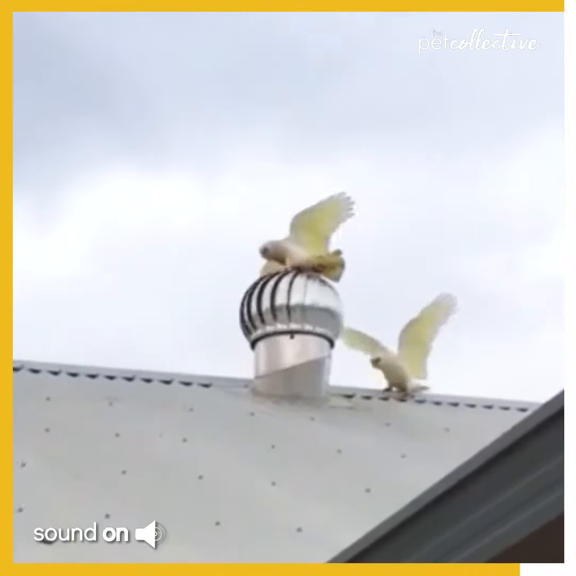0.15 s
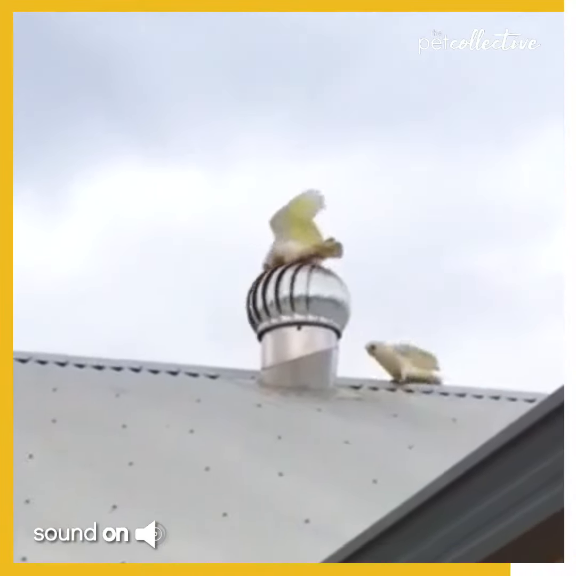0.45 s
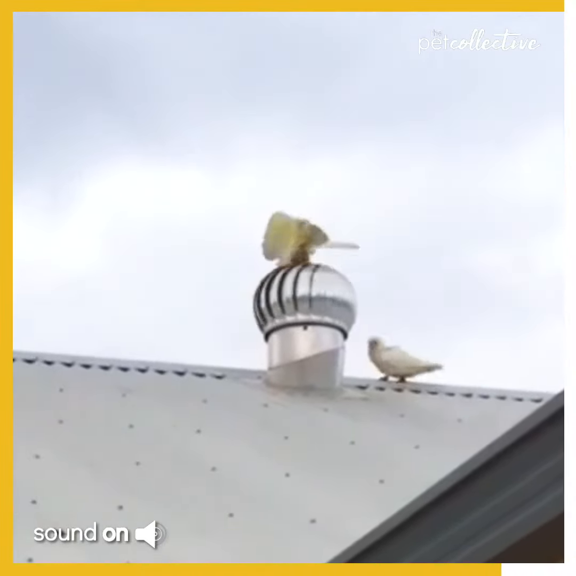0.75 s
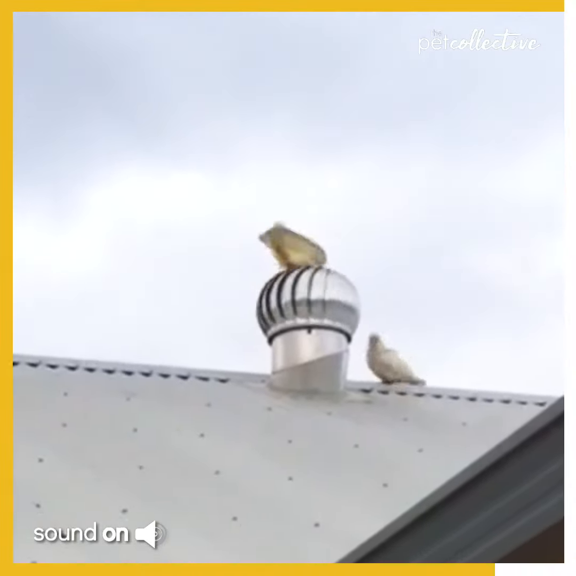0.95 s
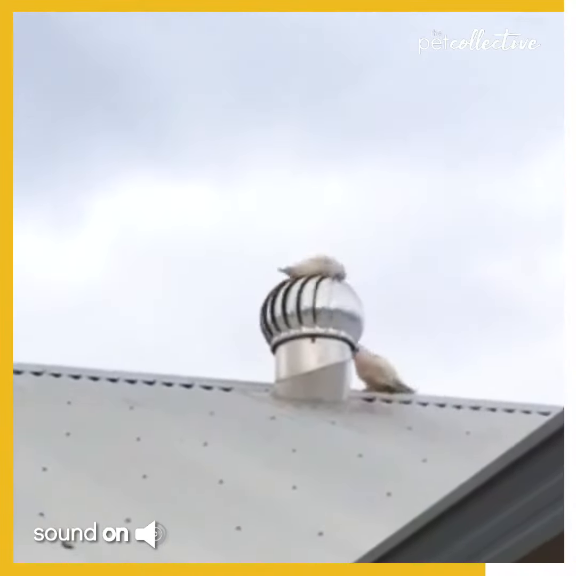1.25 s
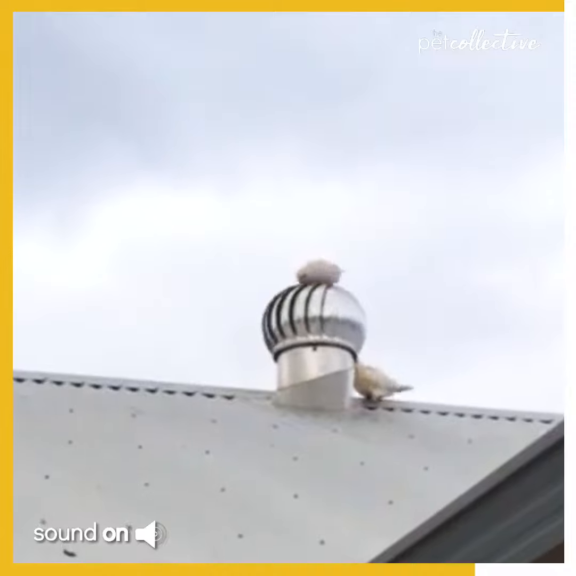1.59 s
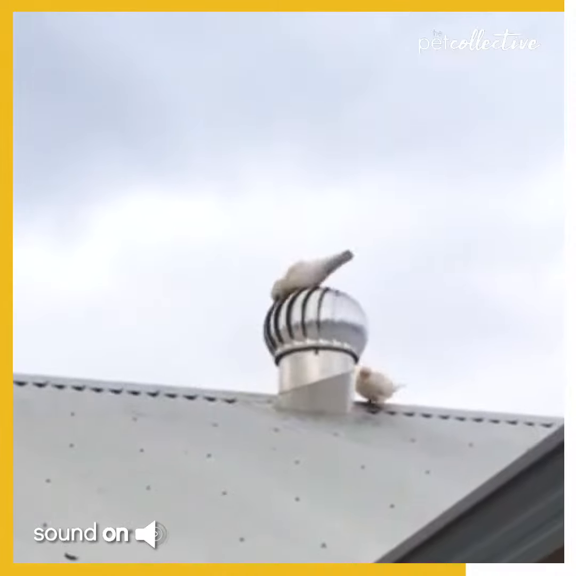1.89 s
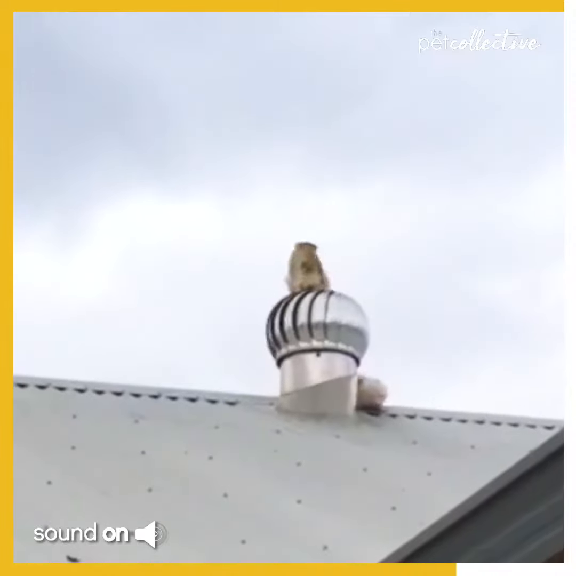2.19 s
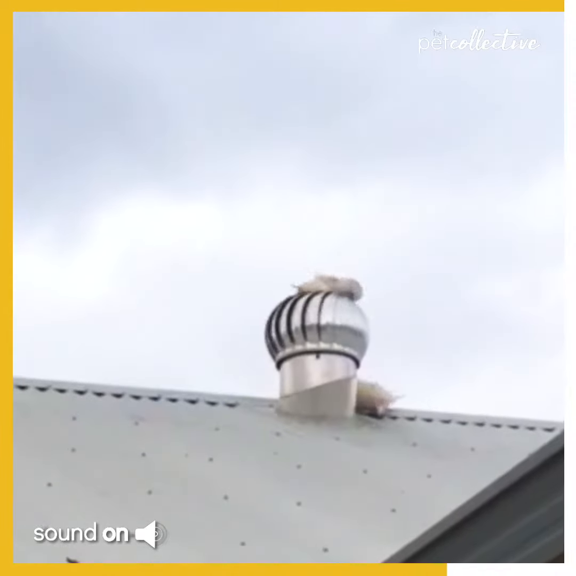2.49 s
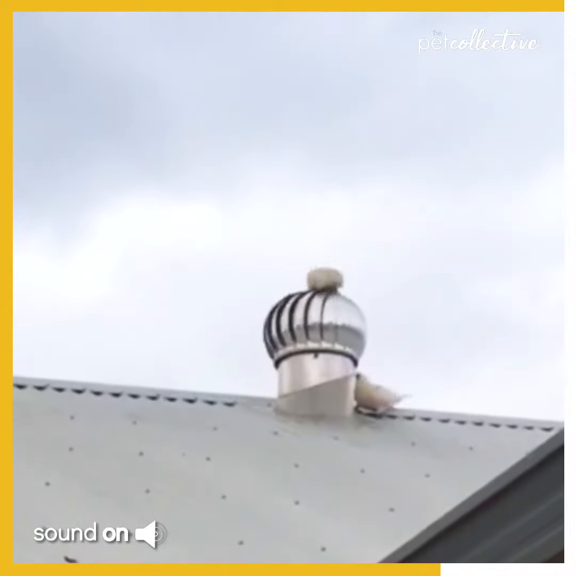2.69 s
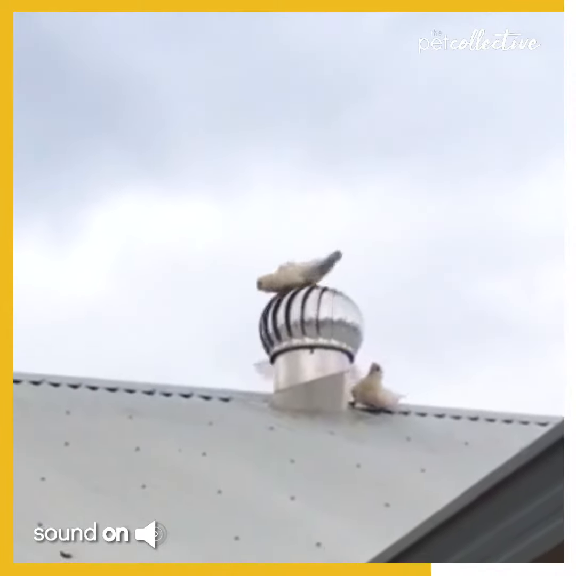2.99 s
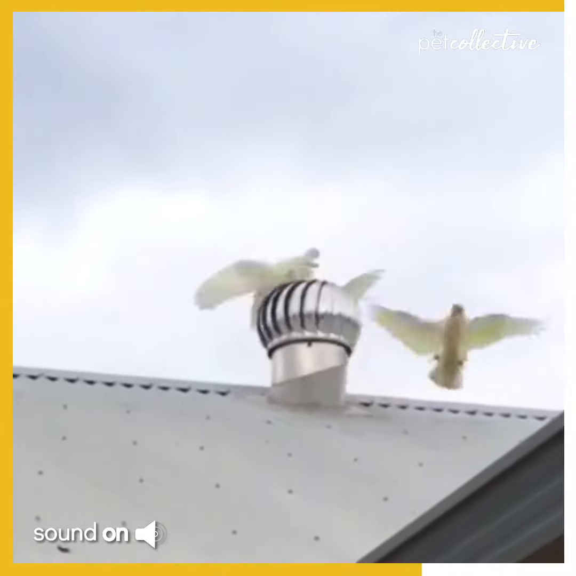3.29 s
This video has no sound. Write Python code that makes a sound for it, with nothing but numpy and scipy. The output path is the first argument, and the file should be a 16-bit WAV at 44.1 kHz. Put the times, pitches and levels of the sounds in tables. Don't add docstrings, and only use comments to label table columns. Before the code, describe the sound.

Outdoors near a busy road, a close cockatoo screeches three times while others squawk behind; engines drone low, and the background dips under loud calls. Later come small peeps, a whistling call and brief feather swishes.

```python
import sys
import numpy as np
from scipy import signal
from scipy.fft import rfft, irfft, next_fast_len
from scipy.io import wavfile
from scipy.ndimage import map_coordinates

SR = 44100
rng = np.random.default_rng(int(sys.argv[2]) if len(sys.argv) > 2 else 0)


def store_wav(level_fs):
    pcm = np.round(np.clip(np.atleast_2d(level_fs), -1, 1) * 32767)
    wavfile.write(sys.argv[1], SR, pcm.T.astype(np.int16))


def convert_level_to_amplitude(level_db):
    exponent = np.asarray(level_db, float) / 20
    return 10 ** exponent


N = 152145
T = np.arange(N) / SR

# time_s, level_db
ROAR_LEVEL = [(0.0, -38.5), (0.22, -38.5), (0.37, -37.5), (0.51, -40.5), (0.64, -48.5), (0.93, -44),
              (1.13, -41.5), (1.74, -41.5), (2.12, -37), (2.87, -39.5), (3.08, -39.5), (3.45, -36.5)]
# frequency_hz, density_db
ROAR_SPECTRUM = [(25, -17.5), (60, 0), (110, -8.5), (200, -9), (450, -22), (750, -15), (1800, -25.5),
                 (10500, -52)]
# time_s, firing_hz, level_db
CAR = [(0, 97, -34), (.06, 101, -32), (.35, 101, -29), (.42, 90, -34), (.5, 86, -50)]
# time_s, firing_hz, level_db
TRUCK = [(1.45, 56, -46), (1.75, 59, -33), (1.97, 60, -34), (2.08, 72, -34), (2.6, 72, -30), (3.1, 73, -35),
         (3.2, 73, -42), (3.45, 60, -36)]
FIRING_ORDERS = [0, -14, -14, -26]
# centre_s, frequency_hz, peak_db, half_width_s
GUSTS = [
    (1.063, 78.5, -17.5, 0.016),
    (3.263, 51.74, -18.5, 0.03),
    (3.455, 51, -24, 0.036),
]
# centre_s, level_db, half_width_s
WINGS = [(2.69, -51, .011), (3.218, -42, .011), (3.15, -52, .1), (2.45, -55, .015), (3.27, -53, .02)]
# frequency_hz, level_db
FEATHER_SPECTRUM = [(1500, -30), (4000, -6), (9000, 0), (11000, -1), (11500, -80)]
# start_s, length_s, low_hz, high_hz, level_db
SIDE_NOISES = [(0.115, 0.031, 5300, 6300, -59), (1.185, 0.032, 10300, 11000, -65),
               (1.348, 0.029, 4180, 5650, -34), (2.022, 0.032, 10300, 11100, -75),
               (3.388, .04, 5600, 7000, -53)]
# time_s, level_db
CHORUS_LEVEL = [(0, -41), (.2, -41), (.5, -28.5), (.8, -49), (1, -32), (1.1, -29.5), (1.4, -30.5),
                (1.8, -33), (2.3, -42), (2.55, -37), (2.75, -37.5), (3, -34), (3.18, -30), (3.3, -34.5),
                (3.45, -35)]
# start_s, length_s, start_pitch_hz, end_pitch_hz, level_db
FAR_CALLS = [(-.05, 0.094, 891, 930, -33), (.26, 0.23, 732, 630, -37.5), (1.14, 0.043, 819, 900, -24.5),
             (1.75, 0.12, 732, 775, -38), (1.87, 0.13, 815, 905, -31.5), (2.4, 0.13, 743, 745, -45.5),
             (2.665, 0.056, 771.3, 670, -36.5), (2.75, .07, 777, 875, -37), (2.87, 0.0398, 820, 810, -40),
             (3.12, 0.05, 856, 970, -38), (3.18, .06, 776, 905, -36.5), (3.28, 0.062, 860, 900, -37.5)]
# start_s, length_s, start_pitch_hz, end_pitch_hz, level_db
PEEPS = [(2.47, .03, 755, 725, -33), (2.52, .02, 710, 730, -38), (2.56, .04, 775, 815, -35),
         (2.65, .03, 825, 810, -31), (3.3, .03, 870, 860, -37)]
# time_s, pitch_hz, level_db
CHIRP = [(2.485, 3650, -52), (2.497, 3400, -41), (2.515, 3050, -37), (2.54, 3250, -37), (2.562, 3700, -41),
         (2.578, 3900, -54)]
# time_s, pitch_hz, level_db, second_over_first_db
COO = [(1.01, 675, -44, -6), (1.035, 690, -38, -6), (1.075, 795, -37, -1), (1.105, 680, -41, -8),
       (1.14, 673, -35, -6), (1.185, 690, -40, -4), (1.22, 740, -50, 0), (1.31, 740, -48, 0),
       (1.325, 740, -36, -5), (1.44, 705, -36, -5), (1.46, 670, -43, 3), (1.51, 655, -43, 11),
       (1.555, 655, -39, 8), (1.575, 720, -42, 4), (1.6, 750, -42, 2), (1.64, 680, -43, 0),
       (1.69, 670, -40, -6), (1.72, 675, -50, -6)]
# time_s, pitch_hz, level_db
WHISTLE = [(2.6, 700, -52), (2.64, 700, -40), (2.74, 722, -40), (2.86, 718, -38), (2.96, 730, -39),
           (3.03, 732, -36), (3.1, 715, -38), (3.2, 735, -39), (3.28, 712, -41), (3.36, 735, -39),
           (3.41, 700, -40), (3.46, 640, -42)]
WHISTLE_OVERTONES = [-14, -14, 0, -16, -14, -7]
# time_s, pitch_hz, level_db, roughness (0 clear, 1 harsh)
FIRST_SCREECH = [(.2, 737.7, -46, 1.2), (.41, 754, -30.5, 1.16), (.435, 790, -24, 0.98),
                 (.505, 801, -24, 0.95), (.53, 790, -21, 0.48), (.575, 780, -20.5, 0.31),
                 (.79, 752, -21.5, 0.09), (.83, 742.7, -21, 0.84), (.9, 748, -25, 0.9),
                 (.95, 738, -34.5, 0.97)]
SECOND_SCREECH = [(1.115, 700, -45, .8), (1.155, 720, -25.5, 0.8), (1.27, 745.6, -24, 0.607),
                  (1.34, 748.4, -22.5, 0.47), (1.42, 725, -26.5, 0.72), (1.5, 733, -23, 0.74),
                  (1.58, 739, -23.5, 0.65), (1.65, 766.6, -26.5, 0.7), (1.7, 740, -39, 0.9)]
THIRD_SCREECH = [(1.93, 897, -31, 0.8546), (1.97, 925, -26, 0.81), (2.07, 965, -23, 0.9),
                 (2.12, 933.4, -26, 0.98), (2.18, 1050, -27, 0.89), (2.26, 1010, -27, 0.83),
                 (2.33, 985, -31, 0.91), (2.43, 995, -28, 0.8), (2.47, 940, -57, 0.65)]
# time_s, pitch_hz
CLEAR_PITCH = [(.52, 785), (.54, 803), (.575, 782), (.625, 760), (.655, 756), (.68, 783), (.715, 778),
               (.75, 752), (.84, 756)]
CLEAR_OVERTONES = [-20, -16, 0, -14, -12, -10, -15, -16, -21, -28, -31, -32, -34]
# centre_hz, width_hz, level_db
THROAT_FAR = [(790, 520, -6.5), (1670, 1130, -6.5), (2224, 350, 3), (2636, 240, 1), (3256, 270, -1.5),
              (4390, 950, -8.5), (6080, 1130, -12.5)]
THROAT_PEEP = [(800, 400, -4), (1600, 500, 0), (2400, 500, -10), (3300, 500, -9), (5000, 1500, -26)]
THROAT_FIRST = [(1130, 150, -7), (2360, 400, -1), (3490, 530, 0), (5040, 700, -6), (6190, 1530, -10.5),
                (8900, 5400, -50)]
THROAT_SECOND = [(700, 460, -11), (1225, 220, -1), (2343, 400, 2), (3610, 370, 3.5), (5012, 620, -5),
                 (6535, 990, -8.5), (9300, 7500, -23)]
THROAT_THIRD = [(1005, 390, 2.5), (2090, 450, 1.5), (2600, 230, 1.5), (3200, 384, -1.5), (4480, 490, -4.5),
                (6093, 1000, -13.5), (9000, 2200, -29.5)]


def unit(x):
    return x / np.sqrt(np.mean(x ** 2) + 1e-20)


def curves(rows):
    time_s, *columns = np.transpose(rows)
    return [np.interp(T, time_s, column) for column in columns]


def inside(rows):
    edge_s = .005
    after_start = T - rows[0][0] + edge_s
    before_end = rows[-1][0] + edge_s - T
    return np.clip(np.minimum(after_start, before_end) / edge_s, 0, 1)


def wobble(rate_hz):
    knots = rng.standard_normal(int(N * rate_hz / SR) + 4)
    return map_coordinates(knots, [T * rate_hz])


def phase(pitch_hz):
    return 2 * np.pi * np.cumsum(pitch_hz) / SR


def filtered(x, response):
    size = next_fast_len(N + SR // 2)
    hz = np.fft.rfftfreq(size, 1 / SR)
    return irfft(rfft(x, size) * response(hz), size)[:N]


def noise(spectrum):
    points_hz, points_db = np.transpose(spectrum)

    def colour(hz):
        return convert_level_to_amplitude(np.interp(np.log(hz + 1), np.log(points_hz), points_db, -120))
    return unit(filtered(rng.standard_normal(N), colour))


def yard(x, wet_db):
    t60_s, first_echo_s = .4, .004
    t = T[:SR // 2]
    tail = rng.standard_normal(len(t)) * convert_level_to_amplitude(-60 * t / t60_s) * (t > first_echo_s)
    wet = signal.fftconvolve(x, tail / np.linalg.norm(tail))[:N]
    return (x + convert_level_to_amplitude(wet_db) * wet) / np.sqrt(1 + convert_level_to_amplitude(2 * wet_db))


def fades(count):
    depth_db, rate_hz = 2.4, 55
    knots = convert_level_to_amplitude(depth_db * rng.standard_normal((count, 4 * rate_hz)))
    return [np.interp(T * rate_hz, np.arange(len(gains)), gains) for gains in knots]


def overtones(pitch_hz, levels):
    cycle = np.exp(1j * phase(pitch_hz))
    partial, stack = cycle, 0
    for level, fade in zip(levels, fades(len(levels))):
        stack = stack + level * fade * partial.real
        partial = partial * cycle
    return stack, cycle.real


def syrinx(pitch_hz, rough):
    jitter, breath, scatter_db = .08, .9, 2.5
    shaken_hz = pitch_hz * (1 + .003 * wobble(40) + jitter * rough * wobble(350))
    pulses, cycle = overtones(shaken_hz, np.arange(1, 15) ** .095)
    puffs = (1 + cycle) * rng.standard_normal(N)
    share = np.clip(breath * rough, 0, 1)
    mix = np.sqrt(1 - share) * unit(pulses) + np.sqrt(share) * unit(puffs)
    return mix * convert_level_to_amplitude(scatter_db * rough * wobble(250))


def throat(x, peaks):
    def response(hz):
        total = 0
        for k, (centre, width, db) in enumerate(peaks):
            loss = 1j * hz * width
            total = total + (-1) ** k * convert_level_to_amplitude(db) * loss / (centre ** 2 - hz ** 2 + loss)
        low = (hz / 600) ** 2
        return low / (1 + low) * total
    return filtered(x, response)


def engine(rows):
    hz, db = curves(rows)
    turn = phase(hz * (1 + .004 * wobble(12)))
    tone = 0
    for order, order_db in enumerate(FIRING_ORDERS, 1):
        tone = tone + convert_level_to_amplitude(order_db + 2.3 * wobble(13)) * np.sin(order * turn)
    return convert_level_to_amplitude(db + 2) * inside(rows) * tone


def traffic():
    roar_db = curves(ROAR_LEVEL)[0] + 7 + .83 * wobble(7.91)
    return convert_level_to_amplitude(roar_db) * noise(ROAR_SPECTRUM) + engine(CAR) + engine(TRUCK)


def gusts():
    out = 0
    for centre, hz, db, half_width in GUSTS:
        t = T - centre
        push = np.cos(2 * np.pi * hz * t) + .46 * np.cos(3.4 * np.pi * hz * t)
        out = out + convert_level_to_amplitude(db) * np.exp(-(t / half_width) ** 2) * push
    return out


def wings():
    strokes = sum(convert_level_to_amplitude(db) * np.exp(-((T - s) / width) ** 4) for s, db, width in WINGS)
    return noise(FEATHER_SPECTRUM) * convert_level_to_amplitude(2.5 * wobble(400)) * strokes


def side_noise():
    out = 0
    for start, length, low, high, db in SIDE_NOISES:
        swell = np.exp(-((T - start - length / 2) / (length / 2)) ** 4)
        band = noise([(low - 1, -120), (low, 0), (high, 0), (high + 1, -120)])
        out = out + convert_level_to_amplitude(db) * swell * band
    return out


def chorus():
    crowd = 0
    for pitch_hz in (735, 800):
        voice = syrinx(pitch_hz * (1 + .02 * wobble(4)), .7)
        crowd = crowd + convert_level_to_amplitude(1.5 * wobble(5)) * voice
    return convert_level_to_amplitude(curves(CHORUS_LEVEL)[0]) * unit(throat(crowd, THROAT_FAR))


def calls(table, rough, peaks):
    edge_s, hush_db = .012, 30
    rows = []
    for start, length, from_hz, to_hz, db in table:
        end = start + length
        rows += [(start - edge_s, from_hz, db - hush_db), (start, from_hz, db)]
        rows += [(end, to_hz, db), (end + edge_s, to_hz, db - hush_db)]
    hz, db = curves(rows)
    return convert_level_to_amplitude(db + 1.7 * wobble(30.8)) * unit(throat(syrinx(hz, rough), peaks))


def far_birds():
    voices = calls(FAR_CALLS[::2], .26, THROAT_FAR) + calls(FAR_CALLS[1::2], .26, THROAT_FAR)
    return voices + calls(PEEPS, .15, THROAT_PEEP) + chorus()


def small_bird():
    hz, db = curves(CHIRP)
    return convert_level_to_amplitude(db) * inside(CHIRP) * np.sin(phase(hz))


def cooer():
    hz, db, second_db = curves(COO)
    turn = phase(hz * (1 + .006 * wobble(60) + .009 * wobble(250)))
    first = convert_level_to_amplitude(2.5 * wobble(45)) * np.sin(turn)
    second = convert_level_to_amplitude(second_db - 2 + 2.5 * wobble(45)) * np.sin(2 * turn)
    return convert_level_to_amplitude(db + 2) * inside(COO) * (first + second)


def whistler():
    hz, db = curves(WHISTLE)
    unsteady_hz = hz * (1 + .006 * wobble(40) + .006 * wobble(200))
    tone = overtones(unsteady_hz, convert_level_to_amplitude(np.array(WHISTLE_OVERTONES)))[0]
    return convert_level_to_amplitude(db + 1 + 2 * wobble(35)) * inside(WHISTLE) * tone


def screech(rows, peaks):
    hz, db, rough = curves(rows)
    return convert_level_to_amplitude(db) * inside(rows) * unit(throat(syrinx(hz, rough), peaks))


def first_screech():
    hz, db, rough = curves(FIRST_SCREECH)
    signs = np.resize([1, -1, -1], len(CLEAR_OVERTONES))
    clear_hz = curves(CLEAR_PITCH)[0] * (1 + .003 * wobble(90))
    note = overtones(clear_hz, convert_level_to_amplitude(np.array(CLEAR_OVERTONES)) * signs)[0]
    throb = convert_level_to_amplitude(3 * np.cos(2 * np.pi * 18 * (T - .622)))
    rasp = unit(throat(syrinx(hz, .85), THROAT_FIRST))
    share = np.clip(rough, 0, 1)
    level = convert_level_to_amplitude(db) * inside(FIRST_SCREECH)
    return level * np.sqrt(1 - share ** 2) * unit(note * throb), level * share * rasp


def near_birds():
    note, rasp = first_screech()
    second = screech(SECOND_SCREECH, THROAT_SECOND)
    third = screech(THIRD_SCREECH, THROAT_THIRD)
    return yard(note, -8) + yard(rasp + second + third, -4)


def scene():
    background = traffic() + gusts() + wings()
    other_birds = yard(far_birds(), -4) + small_bird() + cooer() + whistler()
    mono = background + other_birds + near_birds()
    return np.array([mono, mono])


def low_pass(x):
    return signal.sosfilt(signal.butter(12, 11180, fs=SR, output="sos"), x)


def record(dry):
    ceiling = .3
    limited = dry[0] / (1 + np.abs(dry[0] / ceiling) ** 4) ** .25
    mono = filtered(limited, lambda hz: 1 / (1 + (hz / 10340) ** 30))
    side = side_noise()
    return low_pass(np.array([mono + side, mono - side]))


dry = scene()
out = record(dry)
store_wav(out)
```